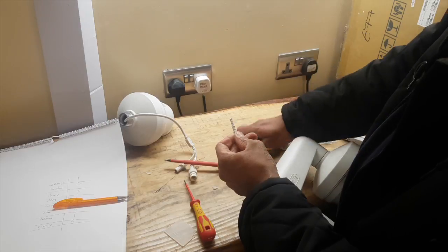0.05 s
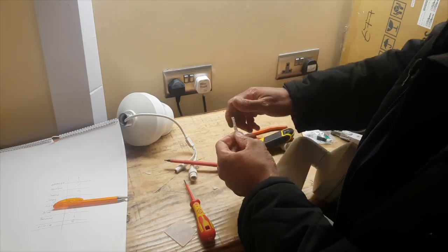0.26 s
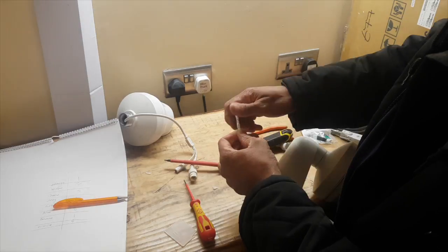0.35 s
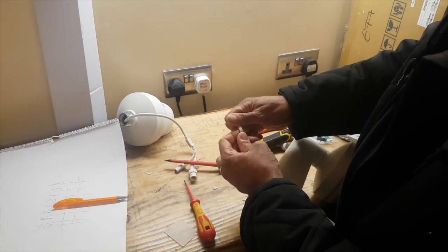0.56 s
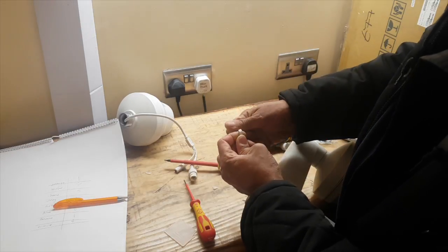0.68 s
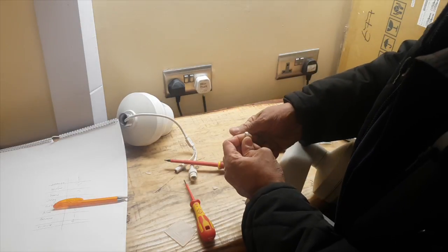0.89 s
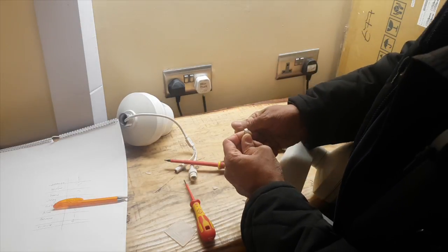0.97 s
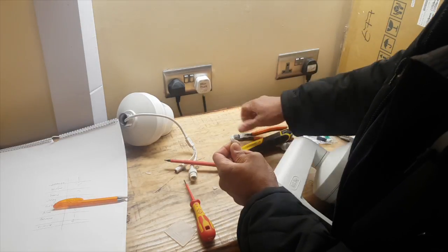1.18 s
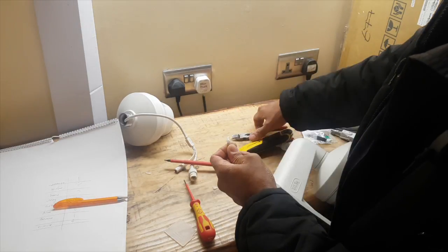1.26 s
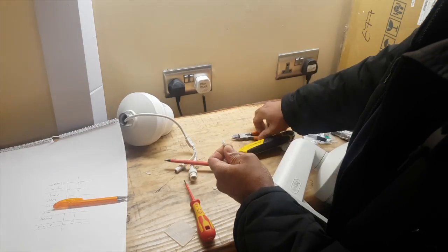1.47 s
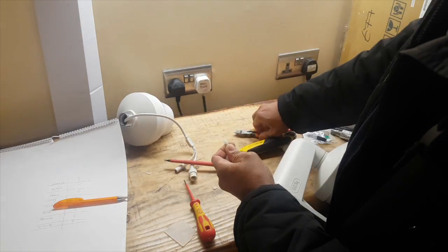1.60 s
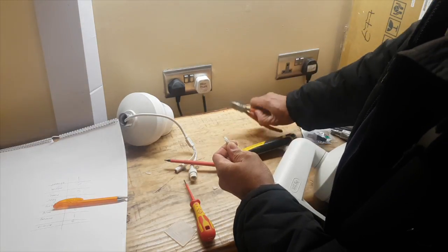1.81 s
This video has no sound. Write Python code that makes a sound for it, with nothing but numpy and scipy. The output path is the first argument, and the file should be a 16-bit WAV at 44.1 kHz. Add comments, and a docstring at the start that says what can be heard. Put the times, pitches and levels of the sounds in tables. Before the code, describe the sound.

A sharp clatter of metal tools on a wooden bench, then cloth rustle and faint clicks

```python
"""A wooden workbench in a small, live room, where someone works on cable with hand snips.
The tools clack three times and rattle briefly on the bench; a sleeve swishes, a hand bumps and scuffs the top,
and the steel snips click twice more. Behind it are faint mains hum and room air.
Hard contacts are bursts of room echo plus decaying tones of wood and steel. Bumps, cloth and air
are filtered noise. The hum, the low thumps and the sway of the bench are sine tones."""
import sys
import numpy as np
from scipy import signal
from scipy.fft import rfft, irfft
from scipy.io import wavfile
from scipy.ndimage import uniform_filter1d

SR = 44100
rng = np.random.default_rng(int(sys.argv[2]) if len(sys.argv) > 2 else 0)


def inscribe(sig):
    """Save sig as 16-bit PCM at rate SR to the path in sys.argv[1].

    A 1-D sig is mono; a 2-D sig holds one channel per row.
    Samples are clipped to [-1, 1] before scaling.
    """
    pcm = np.round(np.clip(np.atleast_2d(sig).T, -1, 1) * 32767)
    wavfile.write(sys.argv[1], SR, pcm.astype(np.int16))


N = 81585  # length in samples
T = np.arange(N) / SR  # time in the scene, seconds
TAIL = np.arange(2 ** 15) / SR  # time since a contact, seconds


def amp(db):
    """Turn decibels into gain."""
    return 10 ** (np.asarray(db) / 20)


def unit(x, span_s=None):
    """Scale to rms 1, overall or as if all the energy lay in a short span."""
    samples = len(x) if span_s is None else span_s * SR
    return x / np.sqrt(np.sum(x ** 2) / samples)


def noise(count):
    """White noise: an independent random value for every sample."""
    return rng.standard_normal(count)


def colour(x, points):
    """Filter through (Hz, dB) points, with a response that never starts before its input."""
    hz, db = np.array(points, float).T
    half = 2 ** 12
    grid_hz = np.maximum(np.linspace(0, SR / 2, half + 1), 1)
    gain_db = np.interp(np.log(grid_hz), np.log(hz), db)
    # folding the cepstrum forward in time gives the minimum-phase filter
    cepstrum = irfft(np.log(amp(gain_db)))
    cepstrum[1:half] *= 2
    cepstrum[half + 1:] = 0
    response = irfft(np.exp(rfft(cepstrum)))
    return signal.fftconvolve(x, response)[:len(x)]


def lowpass(x, hz):
    """Dull the sound above a corner pitch with a second-order low-pass."""
    sos = signal.butter(2, min(hz, SR / 2 - 1), fs=SR, output="sos")
    return signal.sosfilt(sos, x)


def fade(t60_s, rise_s):
    """A quick rise times an exponential decay that drops 60 dB in t60_s."""
    rise = 1 - np.exp(-TAIL / rise_s)
    return rise * np.exp(-np.log(1000) * TAIL / t60_s)


def add(out, start_s, x):
    """Mix a sound in at its time."""
    i = int(start_s * SR)
    out[i:i + len(x)] += x[:N - i]


def walk(rate_hz, t=T):
    """Random drift with rms 1: straight lines between random values, rate_hz of them a second."""
    return unit(np.interp(t * rate_hz, np.arange(2 ** 10), noise(2 ** 10)))


# mains hum tones: pitch_hz, level_db
HUM_TONES = [(100, -80), (199.6, -71.5), (300.5, -74.5)]
# spectrum of the room air: pitch_hz, level_db (per Hz, relative)
AIR_SPECTRUM = [(15, -44.5), (25, -18.5), (110, -4), (156, -17.5), (204, -7.5), (305, -8.5), (331, -20.5),
                (378, -13), (648, -15), (1020, -18.5), (2230, -25), (15500, -37.5)]
AIR_DB, HUM_WAVER_DB = -69.5, 0.5


def background():
    """Room air is steady filtered noise; mains hum is a few sine tones with wavering levels."""
    hum = np.zeros(N)
    for pitch_hz, level_db in HUM_TONES:
        level = amp(level_db + HUM_WAVER_DB * walk(2))
        hum += level * np.sin(2 * np.pi * (pitch_hz * T + rng.random()))
    air = unit(colour(noise(N), AIR_SPECTRUM))
    return np.sqrt(2) * hum + amp(AIR_DB) * air


# pushes that set the bench swaying: start_s, level_db
BENCH_PUSHES = [(.25, -57), (.31, -53), (.405, -62.5), (1.36, -65.5), (1.44, -62.5), (1.72, -63)]
SWAY_HZ, SWAY_RISE_S, SWAY_T60_S = 41, 0.015, 0.71
SWAY_PITCH_DRIFT = 0.094  # rms share of the pitch


def sway():
    """The whole bench wobbles at a very low, drifting pitch that dies away after each push."""
    size = np.zeros(N)
    for start_s, level_db in BENCH_PUSHES:
        add(size, start_s, amp(level_db) * fade(SWAY_T60_S, SWAY_RISE_S))
    pitch_hz = SWAY_HZ * (1 + SWAY_PITCH_DRIFT * walk(25))
    cycles = np.cumsum(pitch_hz) / SR
    return np.sqrt(2) * size * np.sin(2 * np.pi * cycles)


# sleeve swishes: start_s, level_db, rise_s, fall_s, treble_tilt_db (per octave, around 1000 Hz)
SLEEVE_SWISHES = [(0.587, -68.5, .008, 0.042, 8.5), (1.182, -55, 0.036, .05, -1)]
# spectrum of a swish before its tilt: pitch_hz, level_db (per Hz, relative)
SLEEVE_SPECTRUM = [(100, -4), (600, -8), (1500, -5.5), (2800, -3), (3600, 5), (4800, -4.5), (8000, 1),
                   (11000, -6.5), (15500, -15)]
# spectrum of the scuffing: pitch_hz, level_db (per Hz, relative)
SCUFF_SPECTRUM = [(60, -11), (300, 0.5), (1200, -4.5), (2200, -6.5), (4000, -16), (7500, -19), (11000, -27),
                  (15500, -34.5)]
# how loudly hands and cable scuff over time: time_s, level_db
SCUFF_LEVEL = [(0, -65.5), (.12, -67), (.5, -73), (.65, -76), (.77, -70.5), (1.0, -76.5), (1.15, -73),
               (1.33, -63.5), (1.5, -70.5), (1.55, -67.5), (1.72, -68), (1.85, -79)]
SCUFF_GRAIN_DB, SCUFF_GRAIN_HZ = 2.02, 90  # size and rate of the random level changes


def cloth():
    """Rubbing makes noise: sleeve swishes over the grainy scuffing of hands and cable."""
    out = np.zeros(N)
    for start_s, level_db, rise_s, fall_s, tilt_db in SLEEVE_SWISHES:
        tilted = [(hz, db + tilt_db * np.log2(hz / 1000)) for hz, db in SLEEVE_SPECTRUM]
        hiss = unit(colour(noise(N), tilted))
        shape = np.minimum(T / rise_s, 1) * np.exp(-np.maximum(T - rise_s, 0) / fall_s)
        add(out, start_s, amp(level_db) * hiss * shape)
    grainy = noise(N) * amp(SCUFF_GRAIN_DB * walk(SCUFF_GRAIN_HZ))
    scuff = unit(colour(grainy, SCUFF_SPECTRUM))
    time_s, scuff_db = np.array(SCUFF_LEVEL).T
    return out + scuff * amp(np.interp(T, time_s, scuff_db))


# how the room builds up and how its lingering part dies; shared by bumps and clacks
ROOM_RISE_S, LATE_T60_S = 0.0036, 0.32
# soft bumps of the hand: start_s, level_db, thump_db (relative), dullness_corner_hz, room_db (relative)
HAND_BUMPS = [(.868, -56, -21, 800, -30.5), (1.275, -61.5, 2.5, 600, -8), (1.317, -53.5, 1.5, 1580, 4),
              (1.365, -52, 1.5, 1190, -5), (1.400, -54.5, -24, 980, -22), (1.459, -60, -20, 2010, -6),
              (1.57, -58.5, -35, 2020, -14), (1.593, -56, -7.5, 2000, -16), (1.765, -59.5, -20, 1730, -7)]
THUMP_HZ, THUMP_T60_S, THUMP_RISE_S = 149, 0.091, 0.0092
PAT_T60_S, PAT_RISE_S = 0.0837, 0.00456


def bumps():
    """Soft contacts: a dull pat of filtered noise and a low, decaying thump of the bench top."""
    out = np.zeros(N)
    thump = fade(THUMP_T60_S, THUMP_RISE_S) * np.sin(2 * np.pi * THUMP_HZ * TAIL)
    thump = unit(thump, 0.018)
    for start_s, level_db, thump_db, corner_hz, room_db in HAND_BUMPS:
        shape = fade(PAT_T60_S, PAT_RISE_S) + amp(room_db) * fade(LATE_T60_S, ROOM_RISE_S)
        pat = colour(noise(len(TAIL)) * shape, [(80, -20.5), (260, 3), (600, -6), (3000, -11.5)])
        pat = unit(lowpass(pat, corner_hz), 0.012)
        add(out, start_s, amp(level_db) * (pat + amp(thump_db) * thump))
    return out


RING_WOBBLE_RAD, RING_WOBBLE_HZ = 0.38, 111  # reflections keep shifting the phase of each ring


def ring(modes, rise_s):
    """Decaying tones that build up and waver as the sound fills the room."""
    out = np.zeros(len(TAIL))
    for pitch_hz, level_db, t60_s in modes:
        start_cycles = rng.random()
        wobble = RING_WOBBLE_RAD * walk(RING_WOBBLE_HZ, TAIL)
        tone = np.sin(2 * np.pi * (pitch_hz * TAIL + start_cycles) + wobble)
        out += amp(level_db) * fade(t60_s, rise_s) * tone
    return out


# the room falls quickly at first, then lingers; treble above TREBLE_HZ has its own decays
EARLY_T60_S, EARLY_TREBLE_T60_S = 0.27, 0.22
LATE_TREBLE_T60_S, LATE_DB, TREBLE_HZ = 0.33, -11.5, 5000
# uneven first reflections: level scatter, time to smooth out, length of each grain
REFLECTION_SCATTER_DB, DIFFUSE_S, GRAIN_S = 3.5, 0.029, 0.0003


def room(contact_s):
    """A crunching contact and its first reflections melt into a smooth tail; treble falls faster at first."""
    grains = noise(len(TAIL))[(TAIL / GRAIN_S).astype(int)]  # hold each random value for one grain
    scatter_db = REFLECTION_SCATTER_DB * np.exp(-TAIL / DIFFUSE_S) * grains
    echoes = noise(len(TAIL)) * amp(scatter_db)
    echoes /= np.sqrt(uniform_filter1d(echoes ** 2, size=300))  # even out the slower level changes
    # filtering forward and then backward leaves no delay, so the two bands add up exactly
    low = lowpass(lowpass(echoes, TREBLE_HZ)[::-1], TREBLE_HZ)[::-1]
    high = echoes - low
    rise_s = ROOM_RISE_S + contact_s  # a longer contact builds up more slowly
    low_fade = fade(EARLY_T60_S, rise_s) + amp(LATE_DB) * fade(LATE_T60_S, rise_s)
    high_fade = fade(EARLY_TREBLE_T60_S, rise_s) + amp(LATE_DB) * fade(LATE_TREBLE_T60_S, rise_s)
    return low * low_fade + high * high_fade


# tool clacks: start_s, level_db, bass_db, middle_db, treble_db (tone of the crack), contact_s,
# bench_ring_db, tool_ring_db (both relative to the crack), ringing_part (of the tool)
TOOL_CLACKS = [(0.1348, -44, 11, -2.5, 5, 0.0056, -27, -7.5, "shank"),
               (0.208, -39, 9, 7, 0, 0.0044, -1, -14, "shank"),
               (0.2169, -33.5, 3.5, 4, -5, 0.0034, -10.5, -12.5, "body"),
               (0.3218, -24, 5, -9, -3.5, 0.00052, -16.5, -17.5, "jaws"),
               (0.3259, -26, -6.5, 2.5, 0, 0.0012, -1.5, 0.5, "body"),
               (0.345, -39, 0, 1, -4.5, 0.0069, -14, -15, "shank"),
               (0.418, -42.5, 15, 4, -4.5, 0.002, -3.5, -27, "shank"),
               (0.439, -45.5, 16, -11.5, -8.5, 0.0032, -4, -11, "shank"),
               (1.6041, -50, -10, -5.5, 11.5, 0.0013, -46, -1, "jaws"),
               (1.611, -45, 3, 2, -1.5, 0.001, 1, -9.5, "jaws"),
               (1.801, -53.5, 8, 3.5, -7, 0.0021, -1, -16.5, "handles")]
# spectrum of a crack before its own tone: pitch_hz, level_db (per Hz, relative)
CRACK_SPECTRUM = [(50, -40), (115, -17.5), (190, -19), (290, -6), (520, -6.5), (700, -2), (1000, -3),
                  (1850, -4.5), (2200, -8.5), (2700, -7.5), (4600, -15), (7300, -15), (9800, -22),
                  (10500, -26.5), (13000, -27.5), (15500, -38.5)]
# ringing of the bench top: pitch_hz, level_db (relative), t60_s
BENCH_RING = [(135, -15.5, .3), (290.1, -4, .26), (341, -8, 0.3), (444.5, -8.5, .25), (948, -4, 0.22),
              (990, -5.5, .25), (1062, -6.5, 0.18), (1230, -10.5, 0.24), (1280, -8, 0.27), (1460, -12, 0.2),
              (1562, -11.5, 0.18), (1675, -3.5, 0.21), (1872, -4.5, 0.25), (1931, -10, 0.13)]
# ringing of the steel, a list for each part of the tools: pitch_hz, level_db (relative), t60_s
STEEL_RING = {"jaws": [(3324, -4, .33), (3822, -10, .24), (4020, -10.5, .26), (6890, -6.5, 0.23),
              (7294, -3, 0.19), (7445, -4.5, .24), (7040, -11.5, .25), (9350, -1, 0.22), (9660, -1.5, 0.2),
              (9830, -4, .23), (9950, -4.5, 0.13)], "shank": [(2525, -0.5, .15), (2640, -0.5, 0.14),
              (4390, -9, .25), (6928, -10, .22), (7350, -7, 0.12), (9528, -8, 0.16), (14560, -22, .16)],
              "body": [(450.5, -13, 0.18), (632.4, 0, .15), (2898, -17.5, 0.16), (3646, -20, .2),
              (6250, -23, .18)], "handles": [(3120, 6, .15), (6690, 11, 0.22), (7630, 14, 0.2),
              (7960, -10, .2)]}
BENCH_RISE_S, STEEL_RISE_S = 0.0055, 0.0028


def clacks():
    """Hard contacts crack through the room and ring the bench and one part of a tool."""
    out = np.zeros(N)
    bench = unit(ring(BENCH_RING, BENCH_RISE_S), 0.029)
    steel = {part: unit(ring(modes, STEEL_RISE_S), 0.035) for part, modes in STEEL_RING.items()}
    for start_s, level_db, bass_db, middle_db, treble_db, contact_s, bench_db, steel_db, part in TOOL_CLACKS:
        crack = unit(colour(room(contact_s), CRACK_SPECTRUM), 0.029)
        tone = [(130, bass_db), (550, 0.0041), (1500, middle_db),
                (3500, (middle_db + treble_db) / 2), (8000, treble_db)]
        crack = colour(crack, tone)
        ringing = amp(bench_db) * bench + amp(steel_db) * steel[part]
        add(out, start_s, amp(level_db) * (crack + ringing))
    return out


def scene():
    """Everything reaches one microphone, so all the layers add up in one channel."""
    mix = background() + sway() + cloth() + bumps() + clacks()
    return mix[None]


TOP_HZ = 15650


def record(dry):
    """A steep low-pass removes the highest treble, above TOP_HZ."""
    sos = signal.ellip(10, 0.2, 70, TOP_HZ, fs=SR, output="sos")
    return signal.sosfilt(sos, dry)


dry = scene()
out = record(dry)
inscribe(out)
```